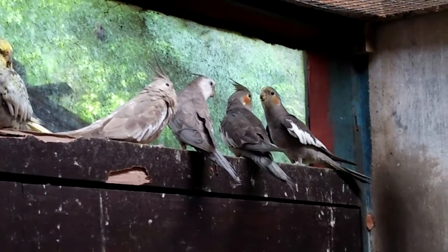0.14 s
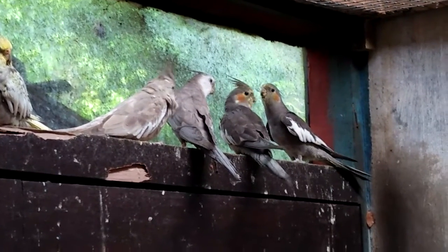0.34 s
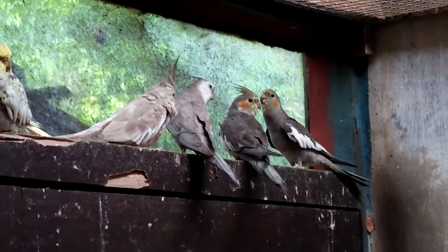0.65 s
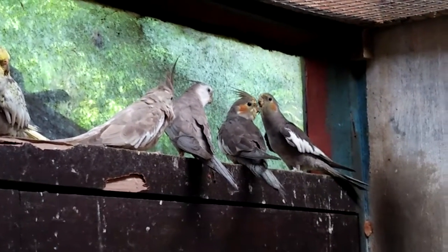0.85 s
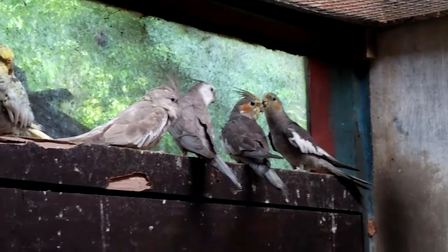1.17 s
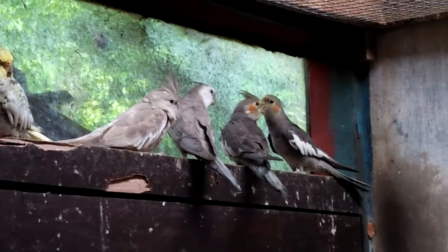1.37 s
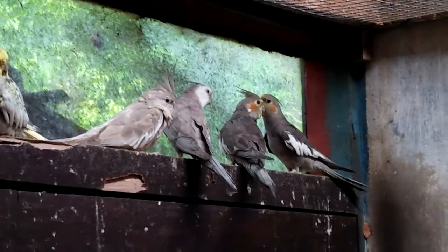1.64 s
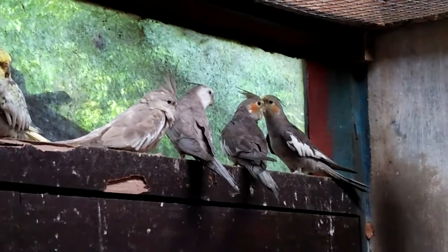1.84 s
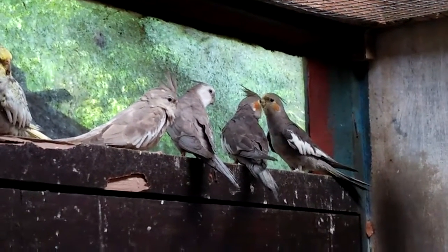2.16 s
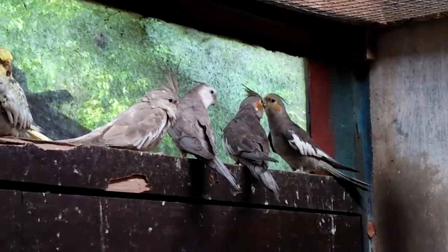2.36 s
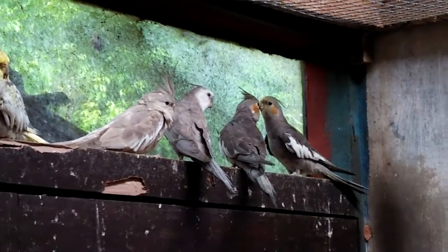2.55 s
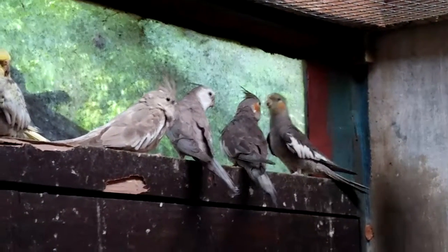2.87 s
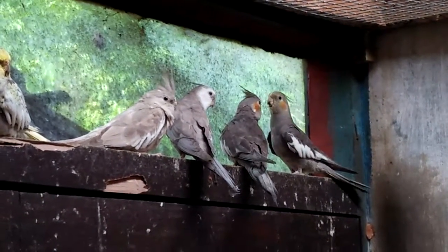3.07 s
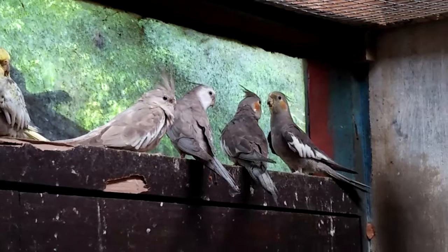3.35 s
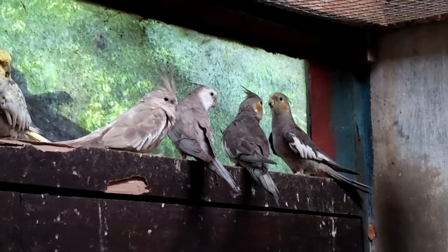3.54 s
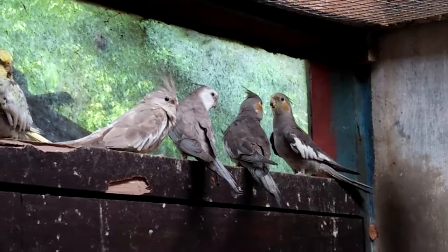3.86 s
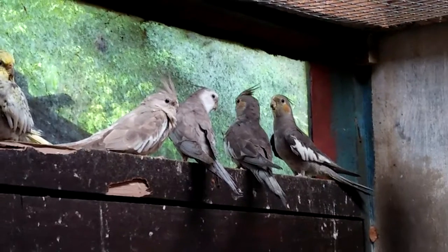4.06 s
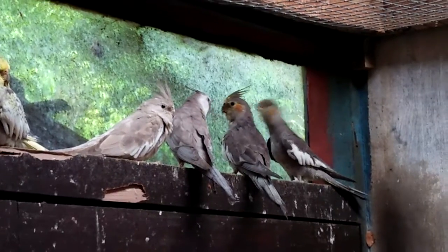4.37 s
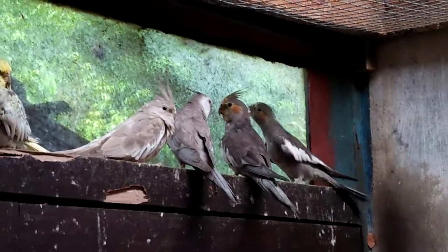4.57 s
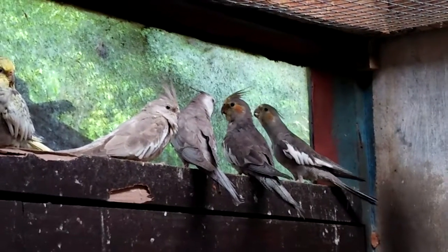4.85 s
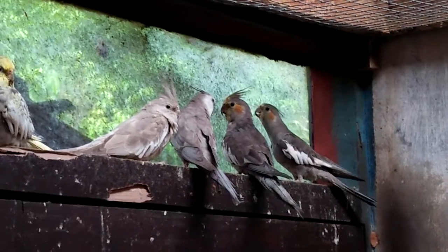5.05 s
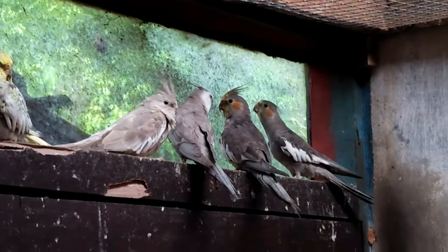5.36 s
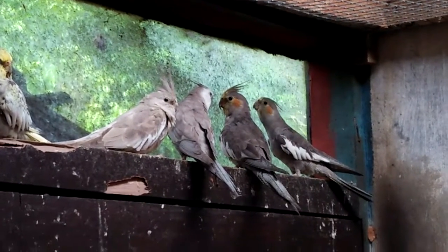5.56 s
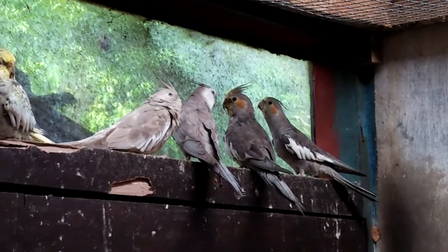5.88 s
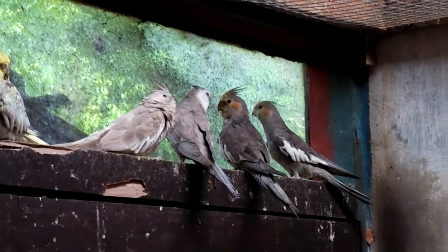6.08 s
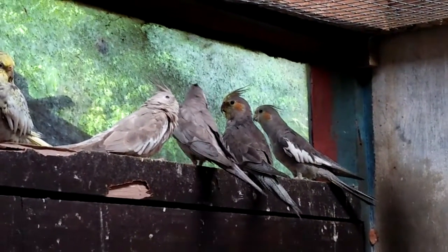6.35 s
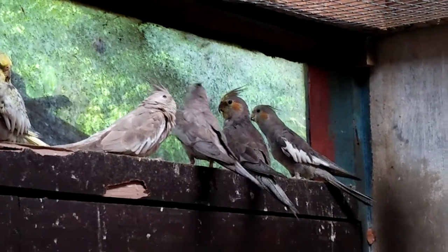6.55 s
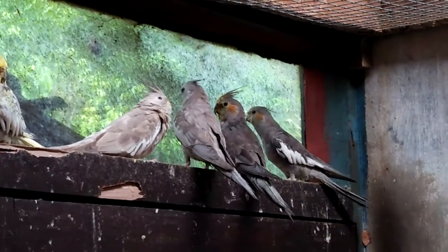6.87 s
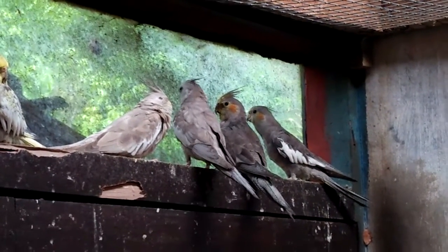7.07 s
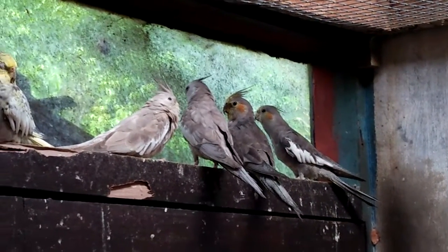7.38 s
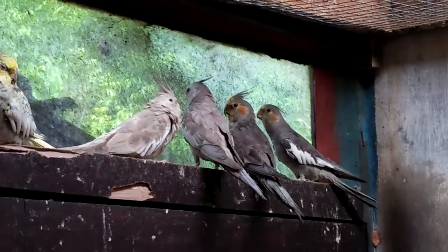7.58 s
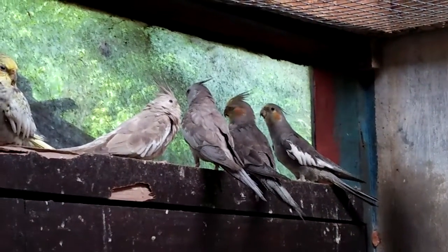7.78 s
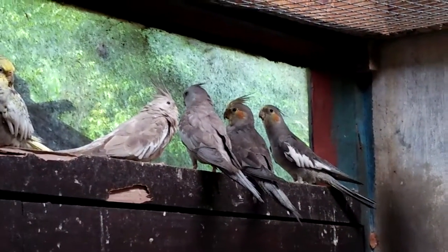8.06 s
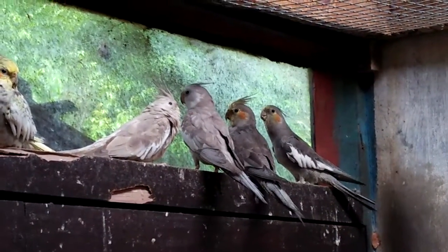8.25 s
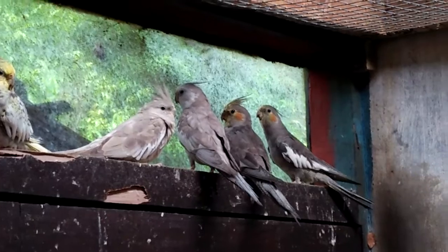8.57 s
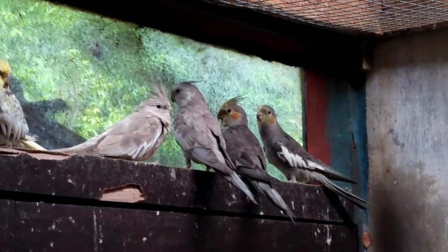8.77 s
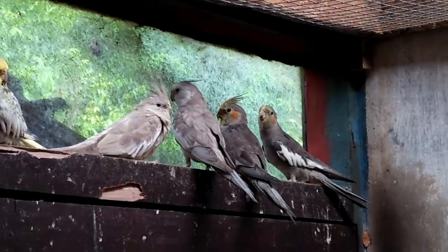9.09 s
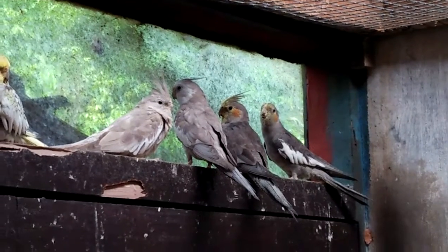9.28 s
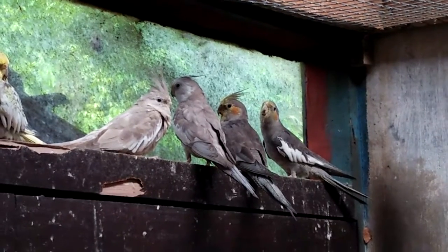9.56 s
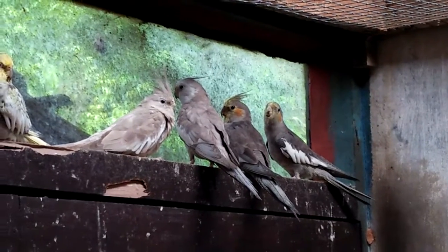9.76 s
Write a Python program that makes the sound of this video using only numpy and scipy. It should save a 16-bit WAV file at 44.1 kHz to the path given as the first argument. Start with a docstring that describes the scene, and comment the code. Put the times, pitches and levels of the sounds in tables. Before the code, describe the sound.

A small flock of cockatiels keeps up short, overlapping chirps, hoarse rasps and a few harsh screeches in a hard-walled aviary. Other birds whistle farther off, and a larger one moans faintly now and then. In the second half a nearby cockatiel gives four loud two-part calls, each falling and then arching upward. Soft feather rustles and dull bumps lie behind, and everything rings briefly over a very faint outdoor hum.

```python
"""A flock of cockatiels gives two-part contact calls, chirps and rasps in a hard-walled aviary.
Each voice is a vibrating membrane heard through the throat; driven into chaos, it screeches.
Other birds whistle further off, and a larger bird moans now and then. Dull bumps and rustling
feathers lie behind them, and it all rings briefly in the enclosure over a faint outdoor hum."""
import sys
import numpy as np
from scipy import signal
from scipy.fft import rfft, irfft, next_fast_len
from scipy.io import wavfile
from scipy.ndimage import uniform_filter1d

SR = 44100
rng = np.random.default_rng(int(sys.argv[2]) if len(sys.argv) > 2 else 0)


def master_out(mix):
    """Clip the mix to full scale and print it as 16-bit PCM to the path in sys.argv[1]."""
    frames = np.transpose(np.atleast_2d(mix))
    ceiling = np.clip(frames, -1, 1)
    pcm = np.round(ceiling * 32767).astype(np.int16)
    wavfile.write(sys.argv[1], SR, pcm)


N = 437472
T = np.arange(N) / SR
TOP_HZ = 14300


def undb(db):
    """Turn decibels into a number to multiply by."""
    return 10 ** (np.asarray(db) / 20)


def unit(x):
    """Scale a signal to an average power of 1."""
    return x / np.sqrt(np.mean(x ** 2))


def at_hz(points, hz):
    """Read between (frequency, value) points, with octaves evenly spaced."""
    f, value = np.transpose(points)
    return np.interp(np.log(np.maximum(hz, 1)), np.log(f), value)


def noise(colour, size):
    """Noise whose colour says how strong each frequency is."""
    padded = next_fast_len(size)
    hz = np.fft.rfftfreq(padded, 1 / SR)
    white = rfft(rng.standard_normal(padded))
    return unit(irfft(white * undb(at_hz(colour, hz)), padded)[:size])


def wander(t, rate):
    """A random wobble, about 1 in size, that turns rate times a second."""
    place = (t - t[0]) * rate
    steps = rng.standard_normal(int(place[-1]) + 2)
    return np.interp(place, np.arange(len(steps)), steps)


def add(out, start, x):
    """Mix x into out from start seconds on."""
    i = max(int(start * SR), 0)
    out[i:i + len(x)] += x[:max(N - i, 0)]


def gesture(points, edge_s=0.0045):
    """Turn a call's points into times, a soft on-off gate and smooth curves."""
    times, *columns = np.transpose(points)
    times = np.sort(times)
    t = np.arange(times[0] - edge_s, times[-1] + edge_s, 1 / SR)
    from_edge = np.minimum(t - t[0], t[-1] - t)
    gate = np.sin(np.pi / 2 * np.clip(from_edge / edge_s, 0, 1)) ** 2
    curves = [uniform_filter1d(np.interp(t, times, c), size=400, mode="nearest") for c in columns]
    return t, gate, *curves


# colour of the hum: (frequency [Hz], level [dB])
HUM_COLOUR = [(20, -12.5), (55, -1.5), (90, -4), (130, 7.5), (220, -6), (380, -11.5), (900, -8),
              (2000, -21.5), (4000, -35), (14000, -31)]
# how the hum swells: (time [s], level change [dB])
HUM_SWELL = [(0, 4.5), (.6, -0.5), (1.4, -3.5), (2, 6), (3, -1.5), (4.2, 2), (4.8, 2), (5.5, 6),
             (6.2, -0.5), (7, 0.5), (8.6, 1.5), (9.92, -0.5)]
def outdoor_hum(level_db=-70.5):
    """A faint, low noise from outside that slowly swells and sinks."""
    swell_db = np.interp(T, *np.transpose(HUM_SWELL))
    return noise(HUM_COLOUR, N) * undb(level_db + swell_db + 1.5 * wander(T, 25))


# colour of the feathers: (frequency [Hz], level [dB])
RUSTLE_COLOUR = [(100, -29), (350, -14.5), (850, 3.5), (2500, 4), (5000, -12), (8000, -11.5),
                 (11000, -15.5), (14500, -21)]
# feather strokes: (loudest moment [s], level [dB], swell [s], fade [s])
RUSTLES = [(.03, -59.5, 0.15, 0.86), (.85, -54, 0.31, .95), (2.6, -54.5, 0.66, 0.2), (3.63, -50, 0.52, 1),
           (4.15, -52.5, 0.23, 0.98), (5.3, -70, .6, 1), (6.3, -49, 0.019, 0.15), (6.7, -53, 0.75, 0.29),
           (7.8, -58, 0.97, 0.51), (7.97, -57, .04, .5), (9.1, -62, 0.41, 0.64), (9.7, -60.5, 0.43, 0.43)]
def rustles(depth_db=26.5, grain_db=2.5):
    """Feathers brush in uneven, grainy strokes; each swell and fade spans depth_db."""
    strokes = [db - depth_db * np.maximum((peak - T) / swell, (T - peak) / fade)
               for peak, db, swell, fade in RUSTLES]
    return noise(RUSTLE_COLOUR, N) * undb(np.max(strokes, axis=0) + grain_db * wander(T, 150))


# colour of a bump: (frequency [Hz], level [dB])
BUMP_COLOUR = [(60, -25.5), (140, -6.5), (190, 7), (235, -8.5), (290, 1), (370, -16), (450, 7), (600, -5.5),
               (850, -1.5), (1300, -22), (3000, -13.5), (12000, -61)]
# dull bumps: (time [s], level [dB], length [s])
BUMPS = [(6.301, -61.5, 0.069), (6.472, -76, 0.059), (6.621, -52.5, 0.063), (6.769, -46.5, 0.029),
         (7.02, -63, 0.034), (7.207, -55, 0.047), (7.455, -50.5, 0.064), (7.766, -46.5, 0.041),
         (8.52, -55.5, 0.036), (8.902, -47.5, 0.069), (9.02, -50, 0.053), (9.248, -50, 0.05),
         (9.471, -60.5, 0.1), (9.656, -44, 0.057)]
def bumps():
    """Soft, scuffing knocks: short pushes of low, hollow noise."""
    out, t = np.zeros(N), T[:SR // 4]
    for start, db, length in BUMPS:
        push = 2 * t / length * np.exp(1 - 2 * t / length)
        add(out, start, noise(BUMP_COLOUR, len(t)) * push * undb(db))
    return out


# how the throat colours a shrill and a throaty screech: (frequency [Hz], level [dB])
SHRILL = [(150, -67), (250, -42), (357, -58), (409, -31.5), (615, -19.5), (821, -21), (1110, -2),
          (1410, -13), (2130, -9.5), (2390, -2), (3090, -13), (3480, -11), (6420, -28.5), (10300, -46.5),
          (14500, -44)]
THROATY = [(150, -74), (250, -47), (477, -7.5), (519, -17.5), (767, -9.5), (879, 0.5), (1110, -2.5),
           (1650, -0.5), (2480, -3), (2990, -20), (3660, -12.5), (5600, -34), (14500, -51.5)]
# screeches: (colour, time [s], swell [s], fade [s], peak level [dB])
SCREECHES = [ (SHRILL, 1.377, .062, 0.33, -21), (THROATY, 2.56, 0.038, 0.072, -32),
             (THROATY, 3.055, 0.076, 0.15, -27), (THROATY, 3.47, .11, 0.36, -37.5),
             (THROATY, 8.005, 0.053, 0.12, -42.5)]
def screeches(depth_db=24.5, rattle_db=1.5, rattle_hz=260):
    """A bird's voice membrane driven into chaos: a rattling roar shaped by the throat."""
    out = np.zeros(N)
    for colour, start, swell, fade, peak_db in SCREECHES:
        low_db = peak_db - depth_db
        t, gate, db = gesture([(start, low_db), (start + swell, peak_db), (start + swell + fade, low_db)])
        roar = noise(colour, len(t))
        rattle = unit(undb(rattle_db * wander(t, rattle_hz)))
        add(out, t[0], roar * gate * undb(db) * rattle)
    return out


def voice(course, throat, overtones_db, rough, slope_db,
          breakup=0, slack=0, waver=0.0056, flutter_hz=700, slack_hz=2100, harmonics=10):
    """Start time and sound of a membrane vibrating in a throat; roughness shakes pitch and strength."""
    t, gate, hz, db = gesture(course)
    # the membrane turns hoarse in fast slides and when it goes slack at low pitch
    octaves_per_s = np.abs(np.gradient(np.log2(hz))) * SR
    looseness = np.clip(2 * np.log2(slack_hz / hz), 0, 1)
    rough = np.clip(rough + breakup * octaves_per_s + slack * looseness, 0, 1)
    shaky_hz = hz * (1 + 0.1199 * rough * wander(t, flutter_hz) + waver * wander(t, 130.7))
    phase = 2 * np.pi * np.cumsum(shaky_hz) / SR
    k = np.arange(1, harmonics + 1)[:, None]  # 1 is the pitch itself, the rest are overtones
    gains = undb(at_hz(throat, k * hz) + slope_db * np.log2(k) + overtones_db * (k > 1))
    gains *= k * hz < TOP_HZ
    gains[1:] *= undb(5.9 * np.array([wander(t, 59.9) for _ in gains[1:]]))  # the overtones flicker
    tone = np.sum(gains * np.sin(k * phase), axis=0) / np.sqrt(np.sum(gains ** 2, axis=0) / 2)
    breath = undb(-39) * rough * noise([(300, -27)] + list(throat), len(t))
    shimmer = unit(undb(1.5 * rough * wander(t, flutter_hz)))
    return t[0], (tone + breath) * gate * undb(db) * shimmer


def note(start, length, first_hz, last_hz, db, peak, bend, rise_db, fade_db, roundness, bow=0):
    """Points (time, pitch, level) of a note that swells and fades; more bend means a later slide."""
    progress = np.linspace(0, 1, 24)
    peak = np.clip(peak, 0.05, 0.95)
    slide_hz = first_hz + (last_hz - first_hz) * progress ** bend
    hz = slide_hz * (1 + bow * np.sin(np.pi * progress))
    from_peak = np.interp(progress, [0, peak, 1], [1, 0, 1])
    below_db = np.where(progress < peak, rise_db, fade_db) * from_peak ** roundness
    return np.c_[start + length * progress, hz, db - below_db]


# the larger bird's throat: (frequency [Hz], boost [dB])
MOAN_THROAT = [(330, -7), (600, 3.5), (1000, 11), (1600, 1), (2500, -4.5), (5000, -62)]
# moans: (time [s], level [dB])
MOANS = [(2.237, -46.5), (5.33, -42.5), (8.172, -44.5)]
def moans(length_s=0.37, first_hz=628.5, fade_db_per_s=49.5):
    """A larger bird's voice sinks ever more slowly while it fades."""
    out, t = np.zeros(N), np.linspace(0, length_s, 24)
    hz = first_hz / (1 + t / 0.02) ** 0.283
    for start, db in MOANS:
        course = np.c_[start + t, hz, db - fade_db_per_s * t]
        add(out, *voice(course, MOAN_THROAT, overtones_db=0, rough=0.33, slope_db=-3, waver=0.022))
    return out


# a cockatiel's throat with the beak nearly shut: (frequency [Hz], boost [dB])
NARROW_THROAT = [(1000, 9.5), (1600, 16.5), (3000, 4.5), (4200, -4.5), (5300, -19), (7000, -25),
                 (9500, -29), (12000, -23), (14500, -23)]
# whistles: (time [s], length [s], first pitch [Hz], last pitch [Hz], level [dB],
# loudest point [share of length], overtone boost [dB])
WHISTLES = [ (0.011, 0.099, 1840, 1728, -31.5, 0.17, -32), (0.044, 0.095, 4480, 3920, -52.5, 0.59, -3),
            (0.108, 0.25, 4010, 3910, -52.5, 0.55, 8.5), (0.247, 0.064, 2750, 2377, -48, 1, -30),
            (0.288, 0.083, 1905, 1514, -40, 0.97, 4), (0.697, .14, 2666, 2480, -28, .9, -17),
            (.71, 0.11, 1825, 1536, -41, 0.73, 1), (1.329, 0.063, 4000, 3960, -42, 0.44, 12.5),
            (1.763, 0.18, 2000, 1556, -40.5, 0.64, -24), (1.851, 0.086, 2645, 2380, -53.5, .4, -3.5),
            (2.15, 0.21, 2641, 2445, -34, 0.9, -12.5), (2.162, 0.077, 1730, 1595, -43, 0.2, -31),
            (2.269, 0.36, 2429, 1955, -24.5, 0.75, -8), (2.258, 0.24, 2777, 2363, -37.5, .22, -14),
            (2.286, 0.11, 3900, 3360, -56, 0.76, 12), (2.466, .1, 1854, 1554, -42.5, 0.37, -12),
            (2.524, 0.09, 2175, 1730, -45.5, 0.77, -6), (2.734, 0.16, 2200, 1528, -40, 0.67, -19),
            (2.85, 0.099, 2670, 2290, -41.5, 0.98, -14), (2.904, 0.094, 1760, 1807, -34.5, 0.3, -25),
            (3.257, 0.12, 1921, 1783, -40.5, 0.24, -17), (3.377, 0.19, 2546, 2315, -33.5, 0.92, -9),
            (3.497, 0.14, 2520, 1900, -24, 0.89, -12.5), (3.637, 0.07, 2050, 1994, -33, 0.33, -3),
            (3.818, 0.058, 2670, 2122, -37.5, 1, -3), (3.827, 0.075, 1736, 1560, -39.5, 0.5, -14),
            (3.965, 0.088, 4020, 3330, -53.5, 1, 20), (4.013, 0.11, 2702, 2054, -37, 0.87, -10),
            (4.073, 0.055, 1235, 1203, -48, .8, -14), (4.132, 0.051, 2080, 2005, -33.5, 0.41, 5.5),
            (4.598, 0.29, 2040, 1724, -41, 0.45, 3.5), (4.62, 0.083, 1613, 1483, -46.5, 1, 4),
            (4.882, 0.13, 1854, 1550, -42, 1, -10.5), (5.456, 0.078, 2047, 1854, -45, 0.31, -19),
            (5.71, 0.091, 1653, 1440, -50, 0.54, -2.5), (5.908, 0.053, 1270, 1036, -59, .25, -11),
            (5.923, 0.053, 2663, 2400, -56.5, .5, -7), (6.051, 0.1, 5500, 3800, -55.5, 0.75, -7),
            (6.108, 0.35, 3830, 3560, -50, 0.24, 5), (6.349, .045, 3400, 1890, -43, 0.47, -6),
            (6.116, 0.16, 1880, 1575, -38.5, 0.9, -18), (7.069, 0.12, 1736, 1510, -37.5, 0.46, -13.5),
            (7.608, 0.086, 1292, 1144, -36, 0.18, 6), (7.964, .19, 1960, 1470, -37.5, .65, -21),
            (8.598, 0.18, 2360, 2090, -58.5, 0.87, -6), (9.524, 0.096, 3810, 3500, -52.5, 1, 8),
            (9.699, 0.24, 1920, 1487, -41.5, 0.47, -2.5), (9.883, 0.036, 2580, 2184, -46, 0.73, -4)]
def whistles():
    """Birds across the aviary whistle notes that mostly slide down."""
    out = np.zeros(N)
    for *call, overtones_db in WHISTLES:
        course = note(*call, bend=0.92, rise_db=19, fade_db=9.5, roundness=1.24)
        add(out, *voice(course, NARROW_THROAT, overtones_db, rough=0.14, slope_db=-6.5,
                        breakup=0.02, slack=0.33, waver=0.012, harmonics=7))
    return out


# a cockatiel's throat with the beak wide open: (frequency [Hz], boost [dB])
OPEN_THROAT = [(1000, 0), (1600, 9), (2900, 0), (3700, -4.5), (5100, -14), (6200, -27.5), (7500, -22.5),
               (10000, -41), (12000, -24.5), (14500, -27)]
# rasps: (time [s], length [s], first pitch [Hz], last pitch [Hz], level [dB],
# loudest point [share of length], overtone boost [dB], roughness [0 smooth, 1 or more hoarse])
RASPS = [ (0.317, 0.087, 2405, 1498, -35.5, 0.067, -15, 0.82),
         (0.863, 0.047, 1508, 1500, -32, 0.12, -27, 0), (1.067, 0.1, 1725, 1603, -28.5, 0.19, 2, 0.75),
         (1.151, 0.1002, 1666, 1700, -27.5, 0.72, 3.5, 0.61), (4.07, .13, 2610, 1924, -35.5, 1, -16, 0.62),
         (4.305, .085, 2570, 1900, -37.5, .5, -31.5, .87), (4.745, 0.098, 1500, 1383, -30.5, 0.67, 6, 0.75),
         (4.932, 0.021, 2780, 1880, -38.5, 0.86, 1.5, 0.67), (5.084, .03, 1656, 1643, -31, 0.19, 15, 0.98),
         (8.757, 0.077, 1595, 1488, -37.5, 0.52, -4, 0.4), (8.778, .125, 2625, 2460, -34.5, 0.85, 7, .9),
         (9.028, 0.056, 1300, 1207, -44.5, 0.53, -5, 1.2), (9.135, 0.11, 1297, 1674, -35, 0.49, 0.5, 0.81),
         (9.269, 0.096, 1620, 1291, -35, 0.63, -5, 0.67),
         (9.483, 0.038, 1190, 1180, -47.5, 0.8, -13.5, 1.1), (9.6, 0.078, 1253, 1449, -40, 0.32, 4, 0.79)]
def rasps():
    """Hoarse notes through an open beak; the pitch bows upwards in the middle."""
    out = np.zeros(N)
    for *call, overtones_db, rough in RASPS:
        course = note(*call, bend=0.87, bow=0.07, rise_db=9.5, fade_db=14, roundness=0.96)
        add(out, *voice(course, OPEN_THROAT, overtones_db, rough, slope_db=-1.5, flutter_hz=821.3))
    return out


# chirps: (time [s], length [s], first pitch [Hz], last pitch [Hz], level [dB],
# loudest point [share of length], overtone boost [dB], roughness [0-1])
CHIRPS = [ (.569, 0.056, 3110, 3234, -30.5, 0.34, 2, 0), (0.604, 0.059, 3233, 3460, -25, 0.35, 4.5, 0.08),
          (0.649, 0.18, 3816, 3430, -37, 0.25, 13, 0.26),
          (0.794, 0.079, 3010, 1475, -22.5, 0.79, -5.5, 0.33),
          (1.04, 0.023, 1495, 1650, -26, 0.33, 5, 0.11), (3.477, 0.013, 2424, 2340, -22, 0.21, -22, 0.08),
          (4.324, 0.17, 2014, 2030, -36, 0.076, 14.5, 0.1),
          (4.432, 0.061, 1637, 1546, -28.5, 0.47, 20.5, 0.14),
          (5.039, 0.048, 3362, 3312, -19, 0.52, 1, 0.18), (5.231, 0.042, 2128, 2230, -28, 0.5, 15.5, 0.04),
          (5.258, 0.02, 2066, 1546, -24.5, .15, 19, 0.37),
          (5.33, 0.087, 1913, 1483, -30.5, 0.48, 19.5, 0.54),
          (5.532, .112, 3810, 1474, -20.5, 0.7, 0, 0.22), (8.886, 0.056, 2283, 1600, -26, 0.43, 13.5, 0.6)]
def chirps():
    """Short, clear notes that hold their pitch and then plunge or flick up."""
    out = np.zeros(N)
    for *call, overtones_db, rough in CHIRPS:
        course = note(*call, bend=2.7, rise_db=17.5, fade_db=10, roundness=0.83)
        add(out, *voice(course, NARROW_THROAT, overtones_db, rough, slope_db=-7.5,
                        breakup=0.011, slack=0.1, waver=0.01))
    return out


def lead_and_arch(start, drop_s, lead_s, climb_s, arch_s, lead_hz, dip_hz, top_hz, lead_db, arch_db,
                  dip_db=-32.5, sag_hz_per_s=1300, fade_db_per_s=24.5):
    """Points (time, pitch, level) of a lead note that sags and drops, and of the arch that follows."""
    t = np.linspace(0, lead_s, 24, endpoint=False)
    held = 1 / (1 + np.exp((t - drop_s) / 0.0087))  # goes from 1 to 0 at the drop
    swell_db = 9 * np.minimum(t / 0.065 - 1, 0)
    hz = dip_hz + (lead_hz - sag_hz_per_s * t - dip_hz) * held
    db = dip_db + (lead_db - dip_db) * held + swell_db
    lead = np.c_[start + t, hz, db]

    t = np.linspace(0, arch_s, 24)
    effort = 1 - np.abs(1 - t / climb_s) ** 2.05  # a higher power flattens the top
    hz = dip_hz + (top_hz - dip_hz) * effort
    db = dip_db + (arch_db - dip_db) * effort ** 2 - fade_db_per_s * (t - climb_s)
    arch = np.c_[start + lead_s + t, hz, db]
    voice_break = (start + lead_s + arch_s + 0.015, 1620, -34.5)
    return lead, np.vstack([arch, voice_break])


# contact calls: (time [s], drop after [s], lead length [s], climb time [s], arch length [s],
# lead pitch [Hz], dip pitch [Hz], top pitch [Hz], lead level [dB], arch level [dB],
# lead's overtone boost [dB], roughness [0-1])
CONTACT_CALLS = [ (6.408, 0.055, 0.11, 0.096, 0.12, 2320, 1553, 3061, -21.5, -17.5, 7.5, 0.03),
                 (6.921, 0.055, 0.1, 0.099, 0.16, 2378, 1468, 3062, -26, -20, 10.5, 0.09),
                 (7.431, .068, 0.094, .125, 0.14, 2146, 1592, 2969, -22.5, -19.5, 8, 0.05),
                 (8.165, 0.065, 0.11, .097, 0.11, 2372, 1643, 3121, -23.5, -24.5, 0.5, 0.01)]
def contact_calls():
    """A near cockatiel sings a falling note, then a loud arch of pitch that breaks downwards."""
    out = np.zeros(N)
    for *call, overtones_db, rough in CONTACT_CALLS:
        lead, arch = lead_and_arch(*call)
        add(out, *voice(lead, NARROW_THROAT, overtones_db, rough, slope_db=-7.5,
                        breakup=0.018, slack=0.055, waver=0.02))
        add(out, *voice(arch, NARROW_THROAT, overtones_db=-4.5, rough=rough, slope_db=-2.5,
                        breakup=0.01, slack=0.12, waver=0.015))
    return out


# echoes off nearby boards and walls: (delay [s], level before echo_db is added [dB])
ECHOES = [(.0043, -27.5), (0.0098, -10.5), (0.0175, -15.5)]
# ring of the enclosure: (frequency [Hz], time to fade by 60 dB [s])
RING_TIMES = [(150, 0.62), (600, 0.54), (1500, 0.42), (3000, 0.3), (6000, 0.29), (13000, 0.093)]
def aviary(x, echo_db, ring_db):
    """Hard walls add a few distinct echoes and a blurred ring whose treble dies first."""
    t, ring = T[:SR], np.zeros(SR)
    hz, white = np.fft.rfftfreq(SR, 1 / SR), rfft(rng.standard_normal(SR))
    centres, fade_times = np.transpose(RING_TIMES)
    for share, fade_s in zip(np.eye(len(centres)), fade_times):
        band = irfft(white * at_hz(np.c_[centres, share], hz))
        ring += band * undb(-60 * t / fade_s)
    # the roof and beams scatter a dense first wave of reflections
    ring *= (1 - np.exp(-t / 0.001)) * (1 + 0.48 * np.exp(-t / 0.032))
    response = undb(ring_db) * ring / np.sqrt(np.sum(ring ** 2))
    response[0] += 1  # the sound that arrives directly
    for delay, db in ECHOES:
        response[int(delay * SR)] += undb(db + echo_db)
    return signal.fftconvolve(x, response / np.sqrt(np.sum(response ** 2)))[:N]


def scene():
    """Near birds have the strongest distinct echoes; far birds are heard mostly as the walls' ring."""
    near = aviary(contact_calls() + chirps() + rasps(), echo_db=6, ring_db=1)
    far = aviary(whistles() + moans(), echo_db=-3.5, ring_db=3)
    noises = aviary(screeches() + bumps() + rustles(), echo_db=1, ring_db=-5.5)
    return (near + far + noises + outdoor_hum())[None]


def record(dry):
    """Cut off the treble above TOP_HZ."""
    return signal.sosfilt(signal.ellip(10, 0.2, 70, TOP_HZ, fs=SR, output="sos"), dry)


dry = scene()
out = record(dry)
master_out(out)
```